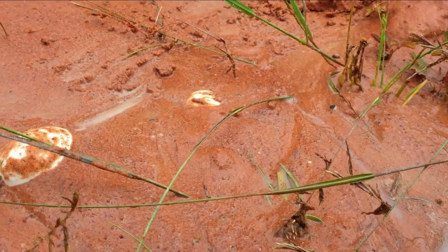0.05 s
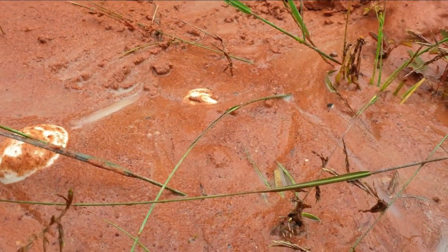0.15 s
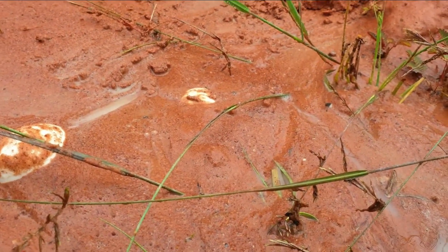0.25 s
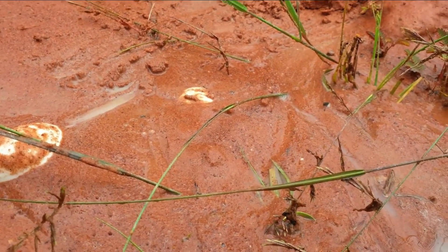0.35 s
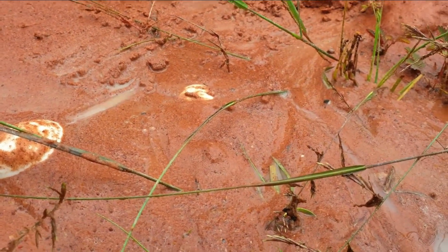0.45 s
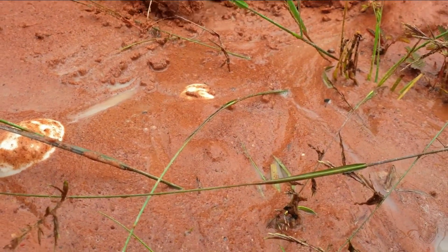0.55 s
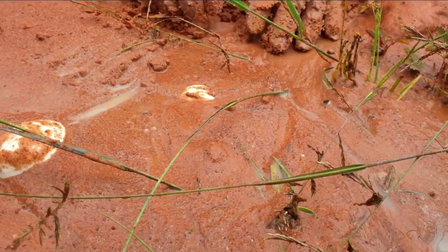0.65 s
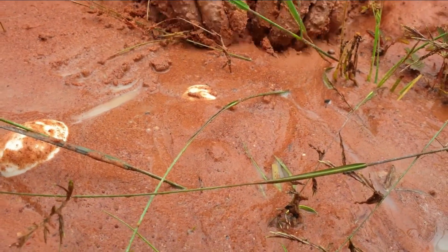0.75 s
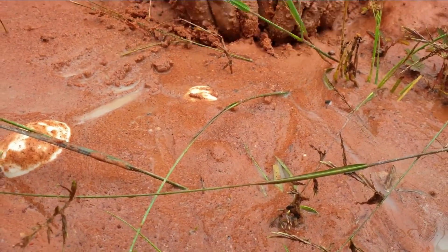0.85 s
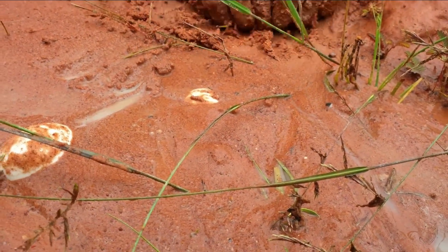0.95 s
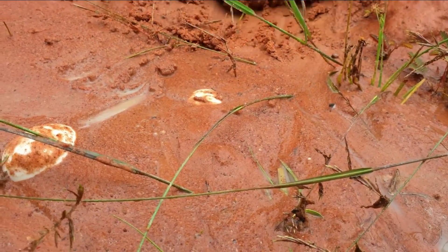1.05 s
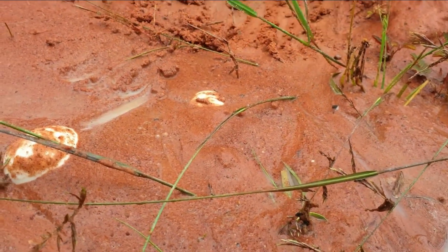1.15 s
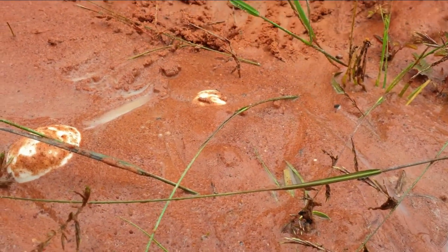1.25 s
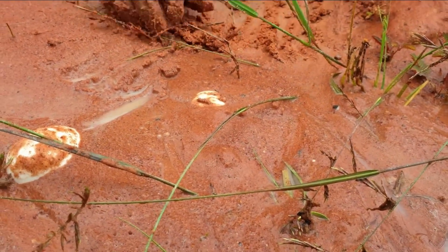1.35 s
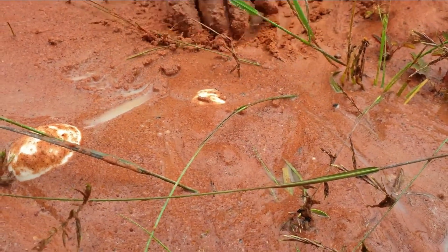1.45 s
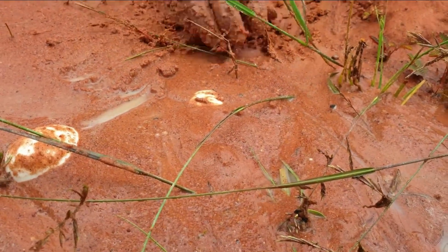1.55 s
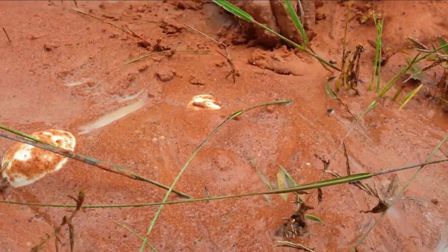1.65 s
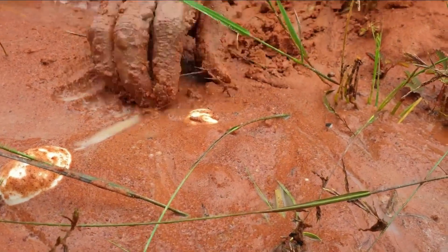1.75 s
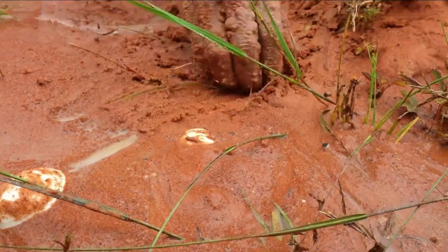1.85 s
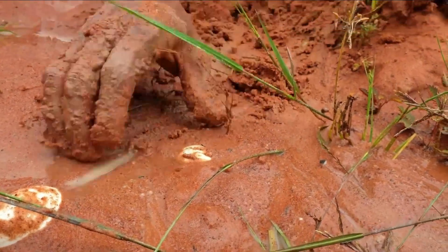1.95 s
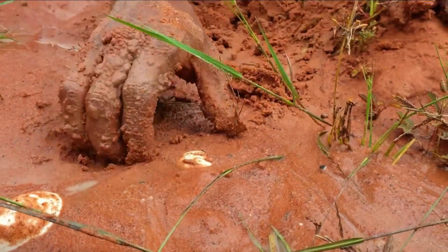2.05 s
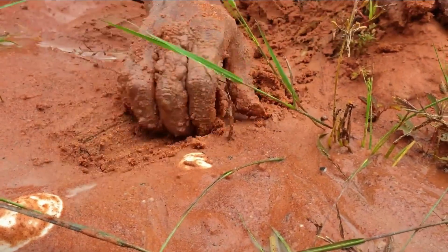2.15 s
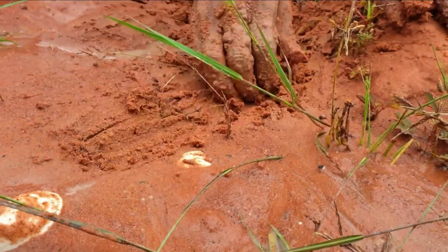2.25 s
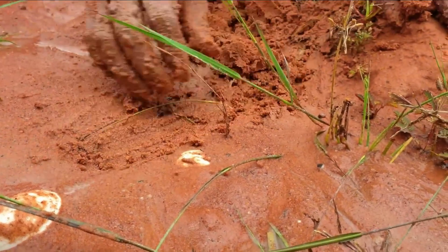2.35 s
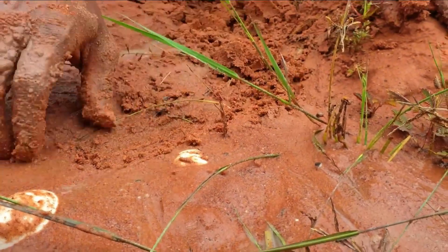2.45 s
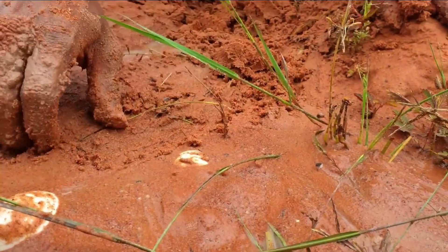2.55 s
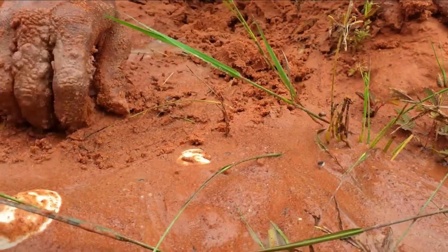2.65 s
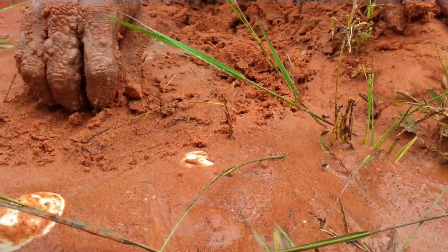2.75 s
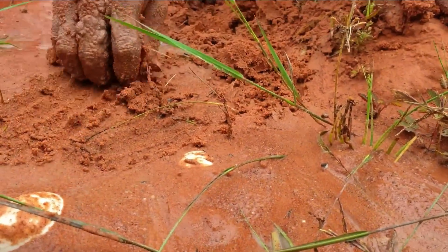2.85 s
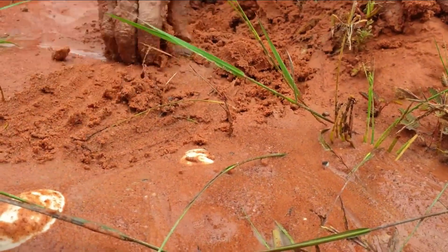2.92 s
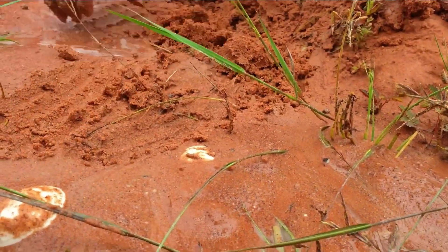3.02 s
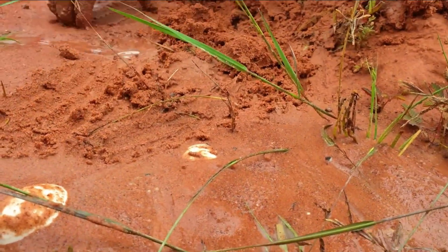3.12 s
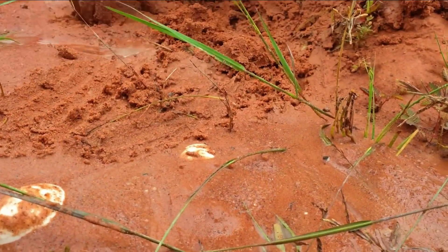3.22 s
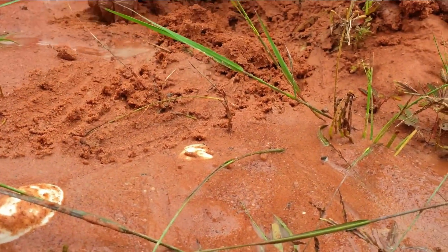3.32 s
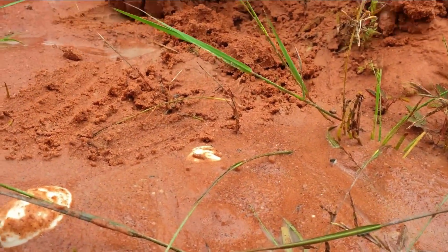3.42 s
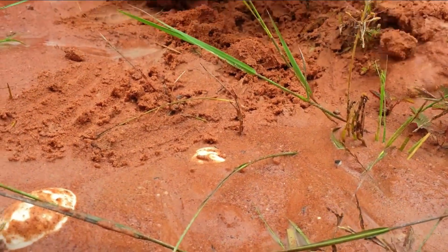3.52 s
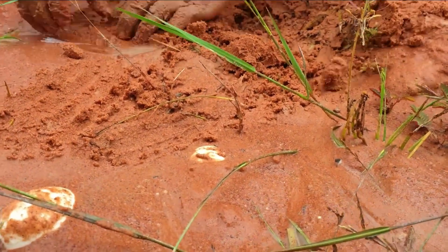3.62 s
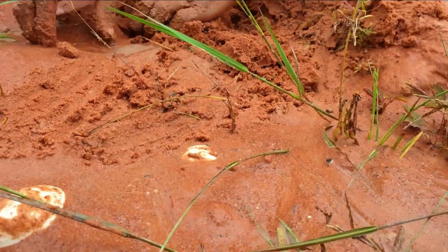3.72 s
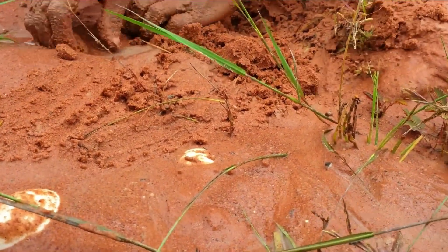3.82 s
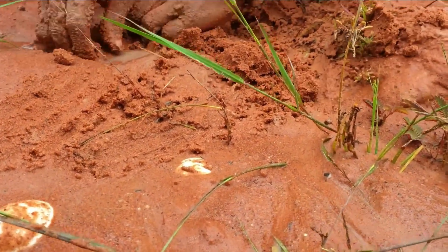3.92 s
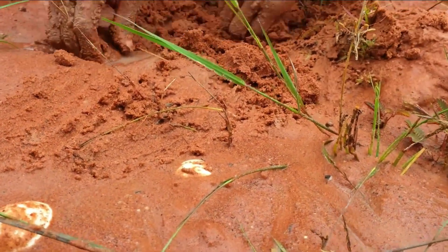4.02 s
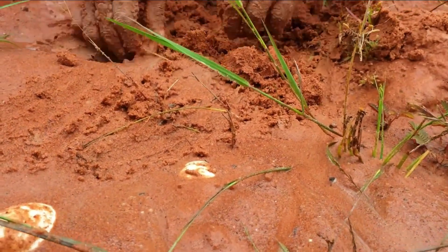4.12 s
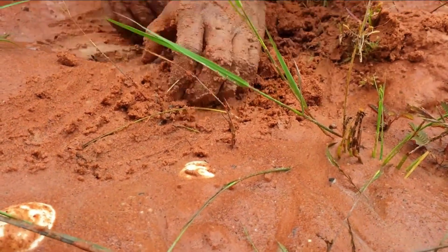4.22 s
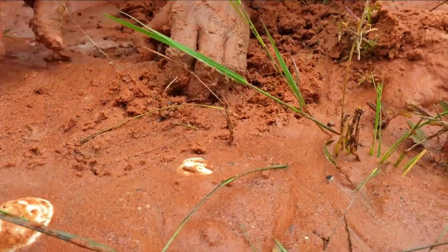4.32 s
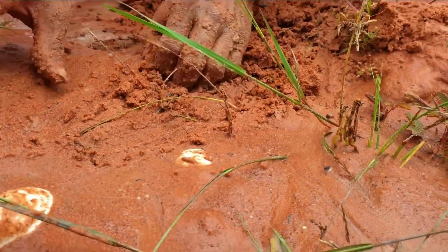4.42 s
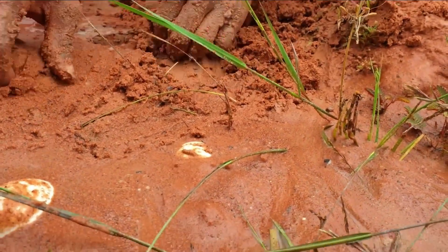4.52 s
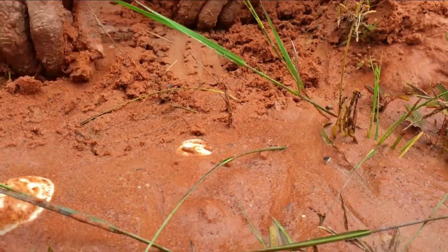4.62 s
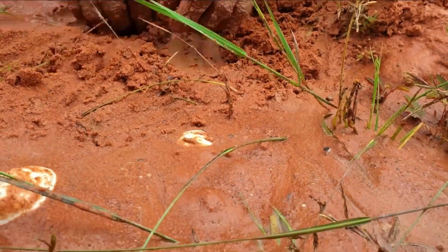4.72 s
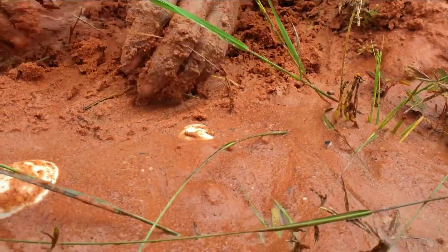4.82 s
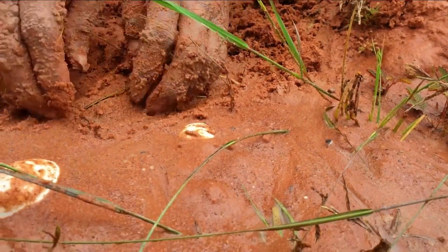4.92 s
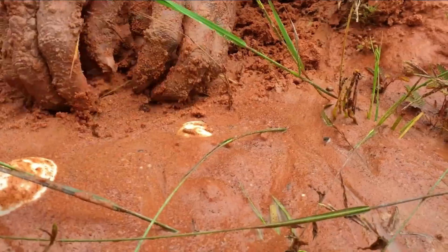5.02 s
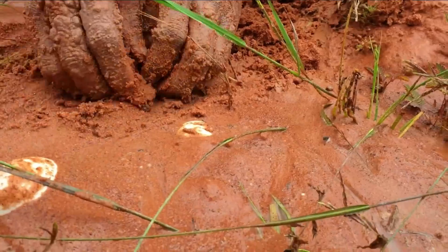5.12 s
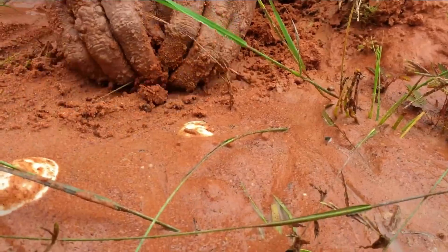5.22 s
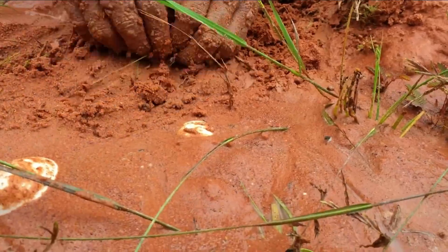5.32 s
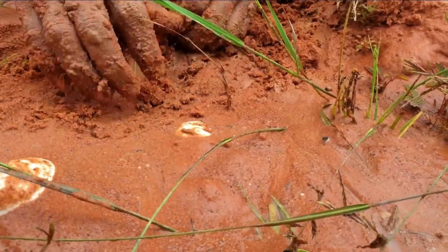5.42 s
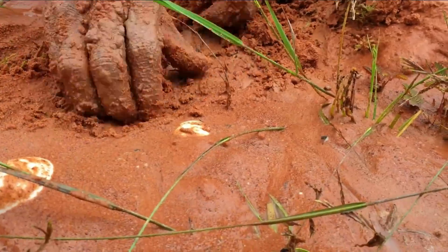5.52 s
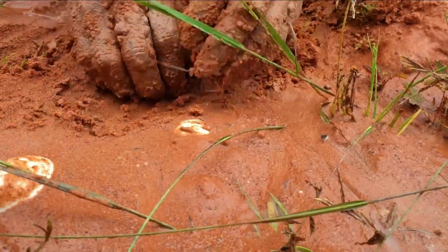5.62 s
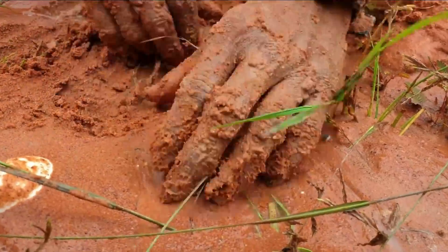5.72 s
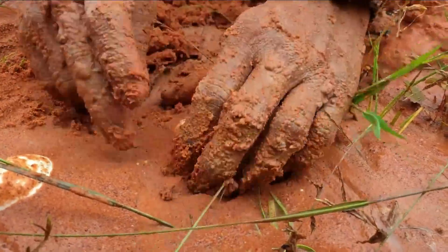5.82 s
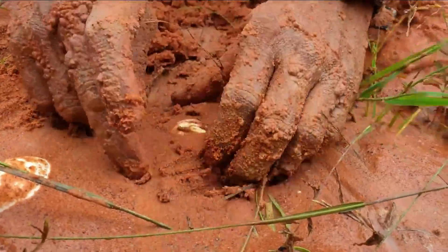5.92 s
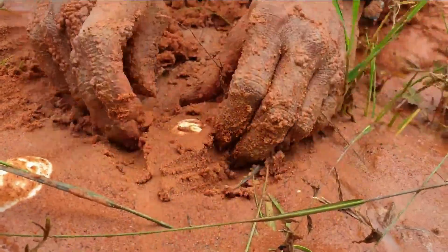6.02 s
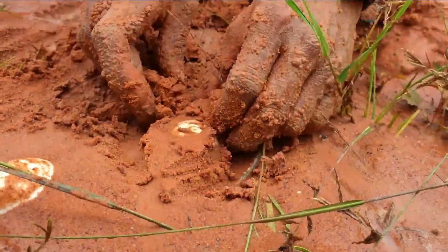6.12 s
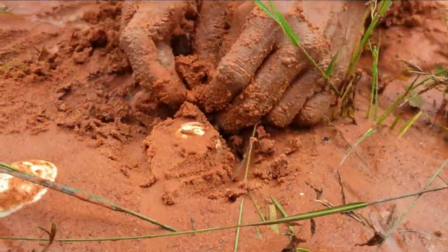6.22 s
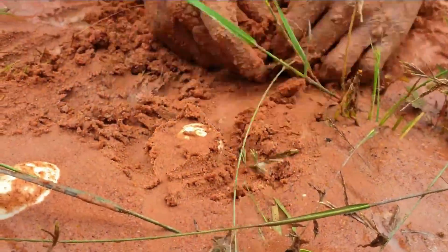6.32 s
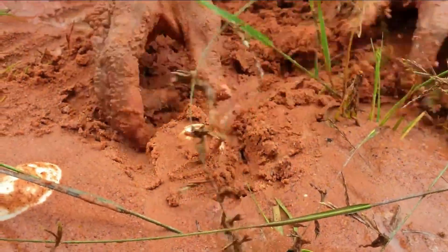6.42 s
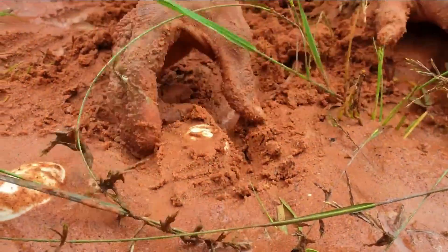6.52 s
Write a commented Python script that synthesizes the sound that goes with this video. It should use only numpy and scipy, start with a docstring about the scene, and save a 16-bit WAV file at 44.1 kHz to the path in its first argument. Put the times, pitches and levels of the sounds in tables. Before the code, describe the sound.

Close, uneven strokes of fingers digging wet sandy soil, dry-edged rasping and late tearing scratches, above lumpy low rumble and faint engine hum.

```python
"""Hands rub through wet sand with a dense, fluttering rasp, stroke after stroke, close by and outdoors.
The rasp is noise made of uneven grains; short gliding bands of noise give the low hollow tones
of the cupped hand and some high resonances in the rasp.
Short noise bursts are fingers tearing packed sand, damped waves are fingertip taps, tiny snaps are grit.
Below lie a lumpy low rumble and a hiss, both noise, and the faint hum of a far engine, made of
wavering tones, which grows towards the end and then eases off."""
import sys
import numpy as np
from scipy import signal
from scipy.fft import rfft, irfft, next_fast_len
from scipy.io import wavfile
from scipy.ndimage import uniform_filter1d, map_coordinates

SR = 44100
rng = np.random.default_rng(int(sys.argv[2]) if len(sys.argv) > 2 else 0)


def unload_audio(sound):
    """Save the sound as a 16-bit wav file, at the path given as the first command line argument."""
    columns = np.transpose(np.atleast_2d(sound))
    # keep every value between -1 and 1, then stretch to whole-number steps
    steps = np.round(np.clip(columns, -1, 1) * 32767)
    wavfile.write(sys.argv[1], SR, steps.astype(np.int16))


N = 289737  # length of the scene [samples]

# Pushes of the hands through the sand: (start [s], rise [s], hold [s], first level [dB],
# level at the end of the hold [dB], level of the treble [dB],
# level of the duller digging sound against the rasp [dB], left over right [dB])
PUSHES = [(0.0, 0.04, 0.044, -41.5, -48, -2.5, -4, -0.5), (0.092, 0.033, .1, -45.5, -51, -6, -5, -1),
          (0.255, 0.017, 0.054, -46, -45.5, -4, -4, -1), (0.329, 0.039, 0.14, -41, -49, -4, -5, -1.5),
          (0.472, 0.033, 0.1, -42, -50.5, -3, -7, -0.5), (0.612, 0.015, 0.074, -43.5, -36.5, -2, -11.5, -2),
          (0.692, 0.017, 0.22, -43, -45, -2, -4.5, -2), (0.866, 0.018, 0.063, -37.5, -41, -2, -14, -3),
          (0.883, 0.099, 0.35, -35.5, -36.5, -3.5, -6, -0.5), (1.344, 0.05, 0.027, -44.5, -49, 1, -4.5, -2),
          (1.459, 0.082, 0.091, -40.5, -37.5, -1.5, -7, -1.5),
          (1.712, .006, 0.025, -49.5, -49.5, 2.5, -14.5, -2.5),
          (1.742, 0.008, 0.043, -34.5, -35, 0, -11.5, -2), (1.894, 0.045, 0.055, -33, -32, -1, -11, -1.5),
          (2.099, 0.008, 0.043, -49.5, -48, 6, -11.5, -1), (2.166, 0.02, 0.08, -39, -32.5, 1.5, -5.5, -1),
          (2.27, 0.012, 0.079, -30.5, -32, -2.5, -7, -1.5), (2.38, 0.0041, 0.029, -36, -36.5, 0, -2, -1.5),
          (2.405, 0.018, 0.19, -46, -59, -4, -2, -2), (2.594, 0.018, 0.027, -42.5, -39.5, 1.5, -11, 1.5),
          (2.647, 0.022, 0.0071, -34, -32.5, 1, -12.5, 1.5),
          (2.694, 0.018, 0.04, -29.5, -31.5, -2.5, -11, 2), (2.753, 0.036, 0.24, -33, -31, -5.5, -9.5, 1),
          (3.031, 0.018, 0.17, -40.5, -67.5, -1.5, -2.5, -2), (3.211, 0.062, 0.15, -44.5, -40, 0, -7.5, -1),
          (3.412, 0.03, .18, -45.5, -39.5, -2.5, -4.5, -1.5),
          (3.727, 0.017, 0.018, -47, -47.5, -1, -5, -1.5), (3.775, 0.036, 0.24, -35.5, -57, -3.5, -5, -0.5),
          (3.959, 0.051, 0.17, -41.5, -52, -6, -0.5, -1), (4.134, 0.049, 0.085, -43, -50.5, -7, -2, 0.5),
          (4.245, 0.041, 0.048, -38, -48.5, -1, -5.5, -0.5), (4.309, 0.045, 0.16, -42.5, -36, 0, -5.5, 2),
          (4.521, 0.033, 0.091, -34, -38.5, -5, -6, 0.5), (4.628, 0.03, 0.11, -33, -39, -6, -3, 0.5),
          (4.737, 0.023, 0.072, -42, -33.5, -4.5, -3.5, 1.5),
          (4.865, 0.015, 0.046, -54, -52.5, -0.5, -12, 0), (5.04, 0.032, 0.11, -43.5, -39.5, 1.5, -15, 1),
          (5.122, 0.029, 0.3, -34, -42.5, -6, -7.5, 1.5), (5.368, 0.058, 0.17, -38, -49, -3.5, -2.5, -2.5),
          (5.557, 0.095, 0.19, -37.5, -39.5, -2, -8, -0.5),
          (5.892, 0.084, 0.16, -38.5, -35, -1.5, -7, -2.5), (6.145, 0.0089, 0.2, -39, -35.5, -2, -5, -1.5),
          (6.332, 0.1, 0.15, -37, -50.5, -2, -3.5, -1.5)]
# Tone colour of the grains sliding at the surface: (frequency [Hz], level per Hz [dB])
SURFACE_COLOUR = [(1900, -49), (2550, -8.5), (3050, -14), (4000, -3.5), (4570, -1.5), (5000, -2), (5750, 0),
                  (6800, -5), (7600, -4), (8600, -13), (10800, -7), (12200, -8.5), (14500, -18),
                  (15700, -32)]
# Tone colour of the wet packed sand under the fingers: (frequency [Hz], level per Hz [dB])
DIGGING_COLOUR = [(250, -18.5), (450, -16.5), (700, -16), (1000, -6), (1350, -2.5), (1900, -3), (2500, 1),
                  (3300, 0), (5000, -11)]
# Short gliding bands of noise, low hollow tones of the cupped hand and high resonances in the rasp:
# (start [s], length [s], first pitch [Hz], middle pitch [Hz], last pitch [Hz],
# width of the noise band [Hz], level [dB])
GLIDING_BANDS = [(0.43, 0.11, 2790, 2790, 2730, 151, -50), (0.862, 0.091, 1200, 1170, 1140, 456, -49),
                 (2.231, 0.18, 4460, 4580, 4600, 246, -40), (2.21, 0.21, 5400, 5480, 5830, 605, -36.5),
                 (2.32, 0.1185, 1043, 1293, 1340, 139, -41.5), (2.4, 0.11, 1256, 1193, 1180, 200, -47),
                 (2.599, 0.092, 1384, 1436, 1430, 354, -50.5), (3.092, 0.037, 1100, 1170, 1310, 250, -49),
                 (3.144, 0.037, 1440, 1490, 1520, 60, -60), (4.252, 0.057, 2350, 2400, 2520, 500, -45),
                 (5.894, 0.071, 1440, 1430, 1420, 90, -54)]
# Fingers tearing through packed sand: (start [s], peak level [dB], thud level [dB], left over right [dB],
# length [s], brightness [dB per octave], pitch of the resonances [times the usual])
SCRATCHES = [(2.382, -44, -43, 1, 0.028, 1, 1), (5.35, -20.5, -43.5, -3, 0.028, 0.5, 1.01),
             (5.436, -26, -45.5, 0, 0.017, 1.5, 1.2), (5.511, -20, -41.5, -2.5, 0.015, 0.5, 1.02),
             (5.592, -18.5, -47.5, -3, 0.023, 3, 1.03), (5.681, -19, -45, -3, 0.024, 4, 0.96)]
# Tone colour of a tear: (frequency [Hz], level per Hz [dB])
TEAR_COLOUR = [(800, -30), (1200, -13), (1520, 1.5), (1850, -6.5), (2530, -0.5), (2900, -8.5), (3450, -3.5),
               (4090, -16), (7190, -11), (9180, -24)]
# Tone colour of the thud under a tear: (frequency [Hz], level per Hz [dB])
THUD_COLOUR = [(170, 2), (300, -1.5), (550, 4.5), (800, -12.5), (1400, -21.5)]
# Fingertips tapping packed sand: (start [s], peak level [dB], pitch [Hz])
TAPS_ON_SAND = [(2.001, -36.5, 903), (5.371, -36, 600), (6.443, -41, 452)]
# Single pieces of grit: (start [s], level [dB], left over right [dB], pitch of the ring [Hz])
GRIT_SNAPS = [(2.3865, -19, 1, 6000), (4.995, -36, 13, 11500)]
# Far engine: (time [s], firing rate [Hz], level [dB], level of the fifth harmonic against the rest [dB])
ENGINE_HUM = [(0, 55.8, -62, -30), (4.9, 56.22, -51, -26), (5.55, 58.3, -48, -29), (5.7, 57.97, -43.5, -17),
              (6.05, 58.67, -47, -20), (6.21, 58.6, -44.5, -27), (6.27, 59, -47.5, -13),
              (6.46, 59.24, -52.5, -8), (6.5, 59.3, -56, -21), (6.57, 59.5, -54.5, -3)]
# Low rumble: (time [s], lower band level [dB], upper band level [dB], pitch of the drone [Hz])
RUMBLE = [(0.0, -53, -46, 54.8), (0.8, -44.5, -49, 57.8), (1.06, -58, -54.5, 55.9), (1.3, -48, -49.5, 48.4),
          (2.2, -46.5, -46, 69), (2.54, -50, -48.5, 60.1), (2.94, -42.5, -49.5, 68),
          (3.24, -47, -51.5, 68.18), (3.89, -46.5, -50.5, 54.1), (4.69, -42.5, -50, 54.15),
          (5.14, -51.5, -47.5, 60.46), (5.59, -44, -45, 67.8), (6.57, -43.5, -50, 65.5)]
# Tone colour of the lower rumble band: (frequency [Hz], level per Hz [dB])
LOWER_COLOUR = [(20, -5), (54, 8.5), (70, 14), (91, 0), (110, 5), (140, -53)]
# Tone colour of the upper rumble band: (frequency [Hz], level per Hz [dB])
UPPER_COLOUR = [(50, -21), (85, -4.5), (118, 3), (135, -6), (157, -1.5), (188, -12.5), (269, -16.5),
                (386, -33), (580, -45), (990, -120)]
# Tone colour of the steady hiss: (frequency [Hz], level per Hz [dB])
HISS_COLOUR = [(180, -40), (300, -0.5), (1060, -9.5), (2000, -5.5), (3030, -85), (6200, -1), (8220, -10),
               (11500, -0.5), (16000, -10)]
# How alike left and right are in most sounds: (frequency [Hz], likeness [0 to 1])
USUAL_LIKENESS = [(60, 0.86), (240, 0.2), (950, 0)]
# The same for the digging sounds and thuds: (frequency [Hz], likeness [0 to 1])
DIGGING_LIKENESS = [(300, 0.97), (1000, 0.041)]
# The same for the tears: (frequency [Hz], likeness [0 to 1])
TEAR_LIKENESS = [(1400, 0.95), (3100, .27), (7000, .05)]
# The two microphone ports hear unequally: (frequency [Hz], left over right [dB])
PORT_BALANCE = [(60, -0.5), (380, -1), (950, -4.5), (2380, 2.5), (5980, 0.5)]

TOUCH_DB = 13  # a push starts this far under its first level
LIFT_DB_PER_S = 466  # how fast a push dies as the hand lifts
REST_DB = -63.5  # sand trickling all the time
CREST_DB = 10.5  # a tear's peaks stand this far above its mean level
DRONE_DB, DRONE_WIDTH_HZ = -1.5, 9  # level against the lower rumble band, before both are levelled together
HISS_DB = -62.5
TOP_HZ = 15500  # nothing is kept from here up


def amp(db):
    """Turns decibels into gain."""
    return 10 ** (np.asarray(db) / 20)


def unit(x):
    """Scales a sound to a mean level (rms) of 1."""
    return x / np.sqrt(np.mean(x ** 2) + 1e-20)


def along(points, hz):
    """Reads a curve of (frequency, value) points, spaced by pitch as the ear hears it."""
    f, v = np.transpose(points)
    return np.interp(np.log(hz + 1), np.log(f + 1), v)


def curves(rows):
    """Draws each column after the time as a line with one value per sample."""
    s, *columns = np.transpose(rows)
    return [np.interp(np.arange(N) / SR, s, column) for column in columns]


def wobble(rate, count=N):
    """A smooth random curve through so many random points a second."""
    points = rng.standard_normal(int(count * rate / SR) + 4)
    return map_coordinates(points, [np.arange(count) * rate / SR])


def filtered(x, response):
    """Colours a sound with a gain for each frequency."""
    count = x.shape[-1]
    padded = next_fast_len(count + 8192)
    spectrum = rfft(x, padded) * response(np.fft.rfftfreq(padded, 1 / SR))
    return irfft(spectrum, padded)[..., :count]


def sides(pan_db):
    """Left and right gains."""
    return amp(np.array([pan_db / 2, -pan_db / 2]))


def swell(s, length, skew=1, count=N):
    """A smooth rise and fall of height 1 from time s; a skew below 1 puts the top earlier."""
    u = np.clip((np.arange(count) / SR - s) / length, 0, 1)
    return np.sin(np.pi * u ** skew) ** 2


def rush(spectrum, patchy_db, grain_db=0, alike=USUAL_LIKENESS):
    """Stereo noise of rms 1, louder and softer in patches; grain_db spreads the sizes of its grains."""
    sizes = amp(grain_db * np.minimum(rng.exponential(size=N), 5.5))
    grains = rng.standard_normal((2, N)) * sizes
    z = signal.stft(grains, nperseg=512)[2]
    # random patches, smoothed over frequency and then over time
    field = uniform_filter1d(rng.standard_normal(z.shape[1:]), size=4, axis=0)
    field = uniform_filter1d(field, size=10, axis=1)
    pair = signal.istft(z * amp(patchy_db * unit(field)), nperseg=512)[1][:, :N]

    def mid_and_side_gain(hz):
        turn = np.arccos(np.clip(along(alike, hz), -1, 1)) / 2
        return amp(along(spectrum, hz)) * [np.cos(turn), np.sin(turn)]

    mid, side = filtered(pair, mid_and_side_gain)
    return unit(np.array([mid + side, mid - side]))


def narrow(hz, width_hz, shared):
    """Narrow stereo noise around a gliding pitch; shared is the gain of the part both sides hear alike."""
    turn, count = 2 * np.pi * np.cumsum(hz) / SR, len(hz)
    both, *own = [wobble(width_hz, count) * np.cos(turn) + wobble(width_hz, count) * np.sin(turn)
                  for part in range(3)]
    return unit(np.array(own) + shared * both)


def strokes():
    """Grains slide under the skin; the grip stutters, so the whole rasp flutters."""
    rasp_db, bright_db, depth_db, pan_db = pushes()
    stutter_db = .7 * wobble(40) + .6 * wobble(170)
    fine = rush(SURFACE_COLOUR, patchy_db=2.0, grain_db=1.8)
    treble = filtered(fine, lambda hz: 1 / (1 + (8800 / (hz + 1)) ** 12))  # above about 8800 Hz
    fine = unit(fine - treble) + amp(bright_db) * unit(treble)
    digging = rush(DIGGING_COLOUR, patchy_db=2.5, grain_db=2.0, alike=DIGGING_LIKENESS)
    digging = amp(depth_db + 0.56 * wobble(60)) * digging
    return amp(rasp_db + stutter_db) * sides(pan_db) * (unit(fine) + digging)


def pushes():
    """Each push lands abruptly, rises, holds and lifts; where pushes overlap, powers add and colours mix."""
    step = 1 / 1000  # [s]
    t = np.arange(0, N / SR + .01, step)
    s, rise, hold, first_db, last_db, *colours = np.transpose(PUSHES)[:, :, None]
    rise, hold = np.maximum(rise, step), np.maximum(hold, step)
    touch = TOUCH_DB * np.clip(1 - (t - s) / rise, 0, 1)
    drift = (last_db - first_db) * np.clip((t - s - rise) / hold, 0, 1)
    lift = LIFT_DB_PER_S * np.maximum(t - s - rise - hold, 0)
    power = amp(2 * (first_db - touch + drift - lift)) * (t >= s)  # doubled dB turn gain into power
    total = power.sum(axis=0) + 1e-300
    total_db = 10 * np.log10(total + amp(2 * REST_DB))
    mixed = [(power * colour).sum(axis=0) / total for colour in colours]
    return curves(np.transpose([t, total_db, *mixed]))


def gliding_bands():
    """Narrow, sputtering noise that glides: low hollow tones of the cupped hand, high resonances in the rasp."""
    out, count = np.zeros((2, N)), SR // 4
    for s, length, *glide_hz, width_hz, db in GLIDING_BANDS:
        hz = np.interp(np.arange(count) / SR, length * np.array([0, .4, 1]), glide_hz)
        shape = swell(0, length, skew=0.74, count=count)
        sputter_db = 0.72 * wobble(51, count)
        tone = amp(db + sputter_db) * shape * narrow(hz, width_hz, shared=0.37)
        out[:, int(s * SR):][:, :count] += tone
    return out


def scratches():
    """Short coarse tearing bursts of big grains, each with a dull thud in the sand."""
    coarse = rush(TEAR_COLOUR, patchy_db=1.5, grain_db=3.5, alike=TEAR_LIKENESS)
    thud = rush(THUD_COLOUR, patchy_db=1.5, alike=DIGGING_LIKENESS)
    out, count = np.zeros((2, N)), SR // 10
    for s, db, thud_db, pan_db, length, tilt_db, pitch in SCRATCHES:
        here = slice(round(s * SR), round(s * SR) + count)

        def tear_gain(hz):
            # brighten, and move the resonances up or down in pitch
            moved_db = along(TEAR_COLOUR, hz / pitch) - along(TEAR_COLOUR, hz)
            return amp(tilt_db * np.log2(hz + 500) + moved_db)

        tear = filtered(coarse[:, here], tear_gain)
        layers = (tear, db - CREST_DB, length), (thud[:, here], thud_db, 1.73 * length)
        for noise, level_db, span in layers:
            shape = swell(0, span, skew=0.43, count=count)
            burst = unit(shape * noise) * np.sqrt(np.mean(shape ** 2))
            out[:, here] += sides(pan_db)[:, None] * amp(level_db) * burst
    return out


def taps():
    """A fingertip gives one dull push and rebound: a wave damped too fast to ring."""
    out = np.zeros(N)
    for s, db, hz in TAPS_ON_SAND:
        cycles = np.arange(256) / SR * hz
        out[round(s * SR):][:256] -= 2 * amp(db) * np.sin(2 * np.pi * cycles) * np.exp(-2.5 * cycles)
    return out


def grit():
    """A stone chip snaps: bright noise and a short ring, both dying by 60 dB in 5 ms."""
    out, t = np.zeros((2, N + 512)), np.arange(512) / SR
    for s, db, pan_db, hz in GRIT_SNAPS:
        noise = rng.standard_normal((2, len(t) + 1))
        crack = noise[:, 1:] - .6 * noise[:, :-1]  # weakens the bass
        ring = .7 * np.sin(2 * np.pi * hz * t)
        snap = (ring + crack) * amp(-60 * t / .005)
        out[:, round(s * SR):][:, :len(t)] += sides(pan_db)[:, None] * amp(db) * snap
    return out[:, :N]


def engine():
    """An unsteady firing tone with its second harmonic and a clean fifth harmonic that comes and goes."""
    hz, level_db, fifth_db = curves(ENGINE_HUM)
    firing = narrow(hz, width_hz=8.9, shared=1.3)
    second = amp(-4.0) * narrow(2 * hz, width_hz=9, shared=1.3)
    fifth = np.sqrt(2) * np.sin(5 * 2 * np.pi * np.cumsum(hz) / SR)
    return amp(level_db) * (firing + second + amp(fifth_db + 2.2 * wobble(14)) * fifth)


def background():
    """Lumpy low rumble in two bands of noise with a wavering drone, and a steady hiss."""
    lower_db, upper_db, drone_hz = curves(RUMBLE)
    lower = amp(2.76 * wobble(4.1)) * rush(LOWER_COLOUR, patchy_db=-1.8)
    drone = amp(DRONE_DB) * narrow(drone_hz, DRONE_WIDTH_HZ, shared=1.56)
    upper = amp(upper_db + 1.1 * wobble(6)) * rush(UPPER_COLOUR, patchy_db=1.84)
    hiss = amp(HISS_DB) * rush(HISS_COLOUR, patchy_db=-0.5)
    return amp(lower_db) * unit(lower + drone) + upper + hiss


def scene():
    """All sources added up at the two microphone ports."""
    hands = strokes() + gliding_bands() + scratches() + taps() + grit()
    return hands + engine() + background()


def record(dry):
    """Each port has its own tone colour, and nothing from the top limit up is kept."""
    return filtered(dry, lambda hz: sides(along(PORT_BALANCE, hz)) * (hz < TOP_HZ))


dry = scene()
out = record(dry)
unload_audio(out)
```